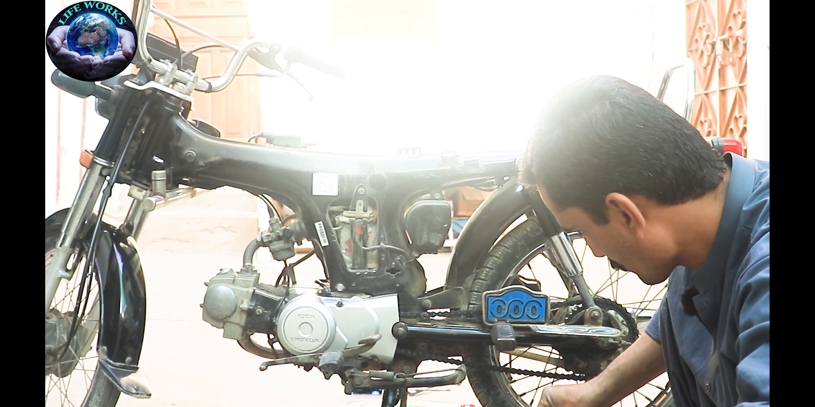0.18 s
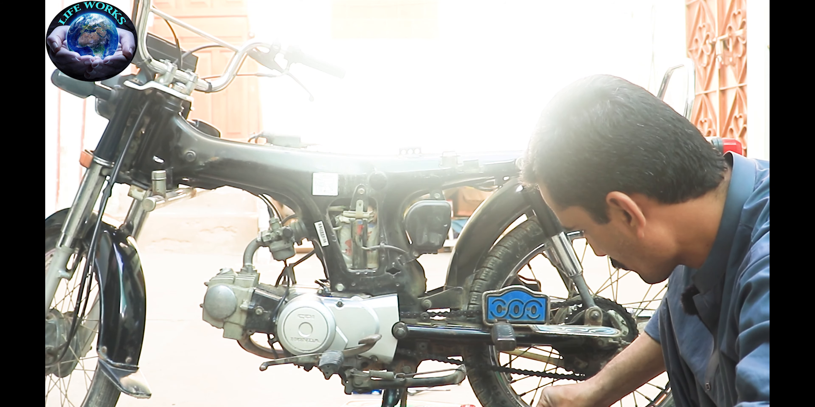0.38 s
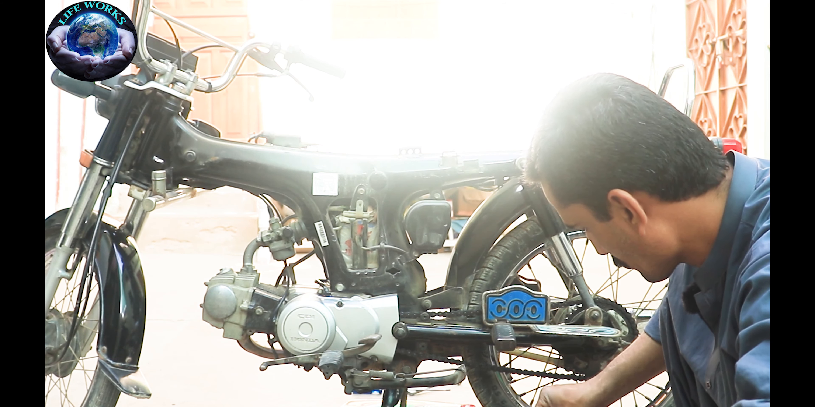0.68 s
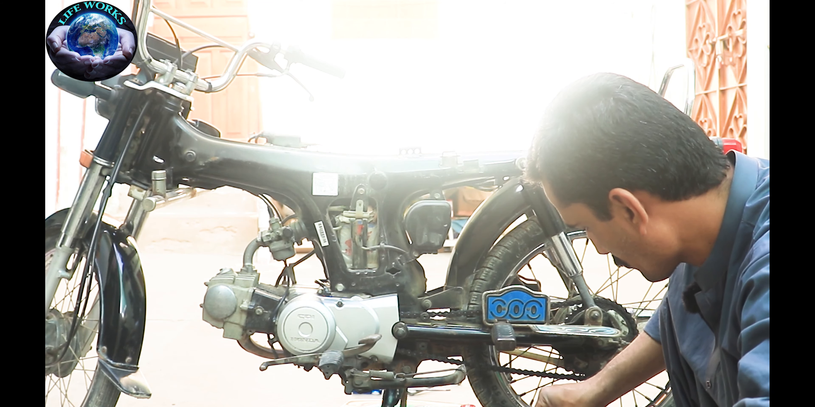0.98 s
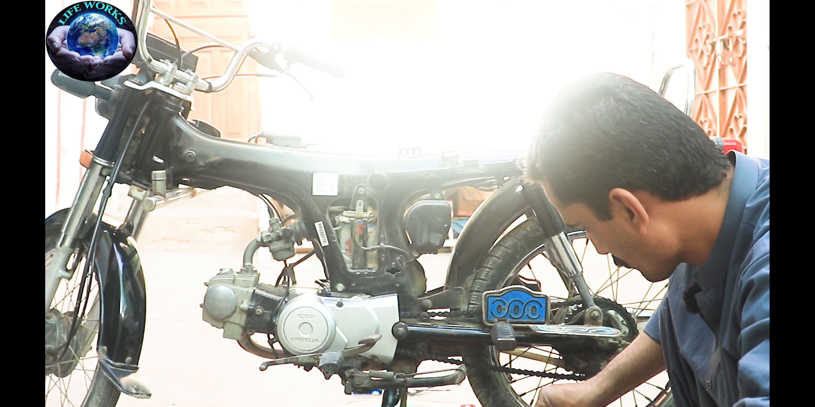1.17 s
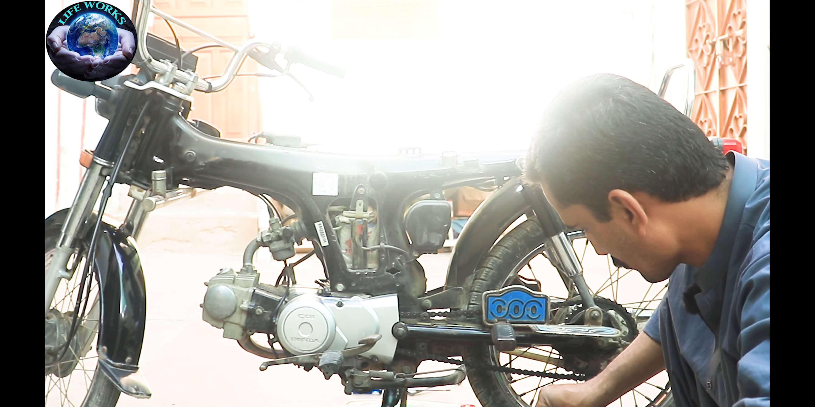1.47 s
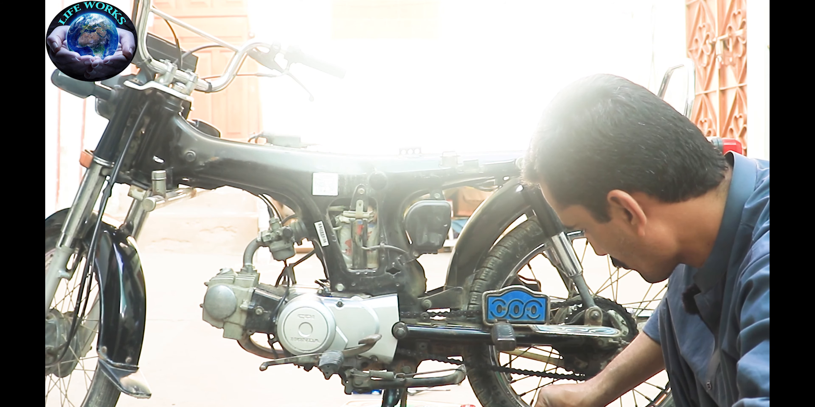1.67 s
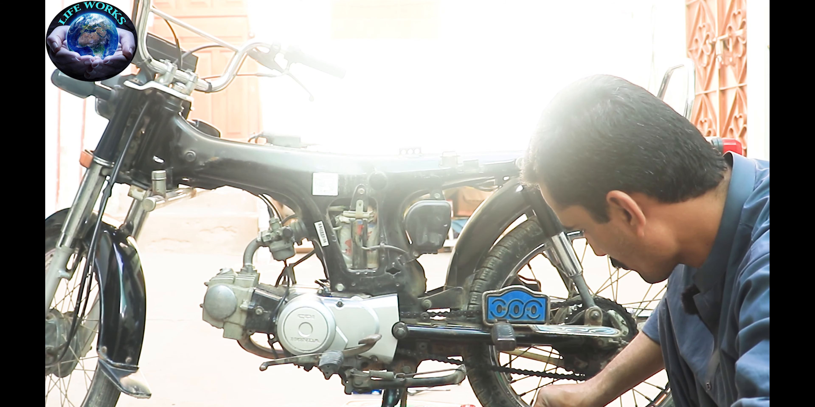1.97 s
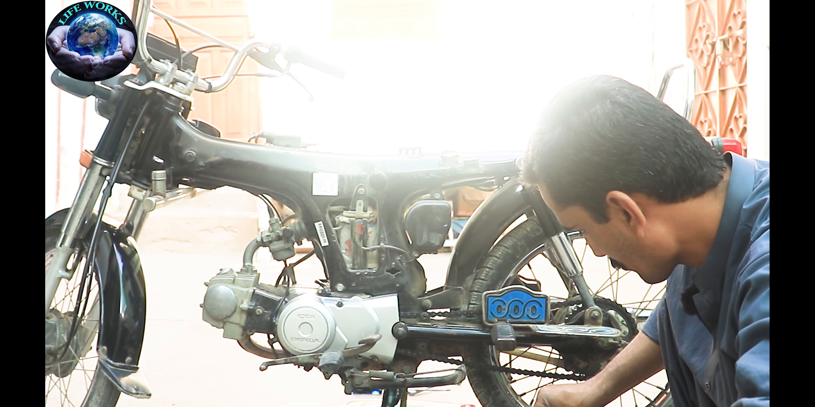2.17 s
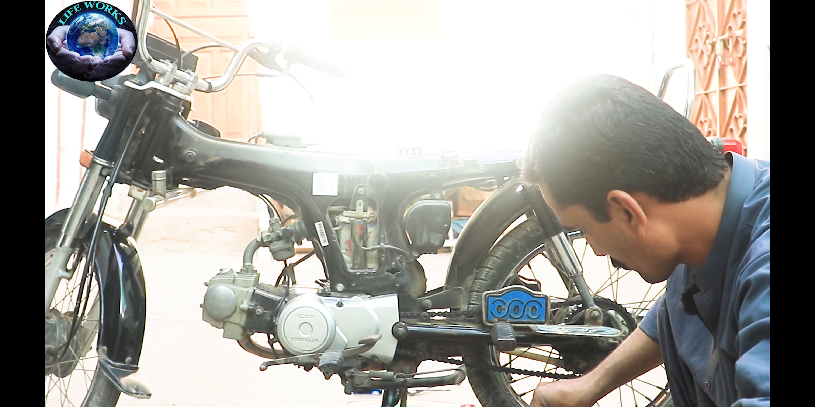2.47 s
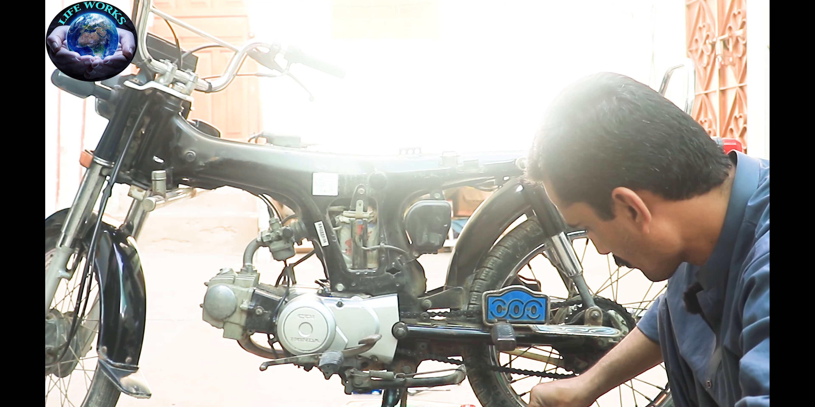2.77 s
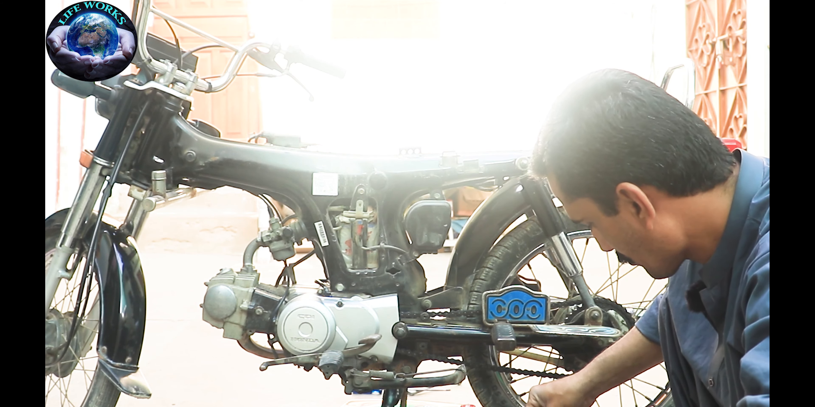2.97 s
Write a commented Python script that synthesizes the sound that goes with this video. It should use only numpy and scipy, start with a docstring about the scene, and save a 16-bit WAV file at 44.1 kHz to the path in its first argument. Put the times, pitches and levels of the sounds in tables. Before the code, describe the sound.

Steel balls drop into a metal fuel tank, striking the walls in uneven clusters of loud sharp cracks with short bright ring; faint rolling rattle and light ticks fill the gaps, very close microphone, slightly overloaded peaks.

```python
"""Inside a metal fuel tank, steel balls drop one after another and clatter against the walls.
Each blow is a snap and a crack of dense modes with a short ring, plus a thud that grows with force;
two weaker blows ring a low panel. Between them: ticks, mostly light, one strong; a faint rolling rattle of
tiny contacts that keeps the tank humming; gliding swishes of band-passed noise, some thin and whistling,
some broad and breathy. The close microphone limits and clips the hardest blows."""
import sys
import numpy as np
from scipy import signal
from scipy.fft import rfft, irfft
from scipy.io import wavfile
from scipy.ndimage import uniform_filter1d

SR = 44100
rng = np.random.default_rng(int(sys.argv[2]) if len(sys.argv) > 2 else 0)


def generate_wav(signal):
    """Clip the signal to [-1, 1] and save it as 16-bit WAV at the path in sys.argv[1]."""
    frames = np.transpose(np.atleast_2d(signal))
    scaled = np.clip(frames, -1, 1) * 32767
    pcm = np.round(scaled).astype(np.int16)
    wavfile.write(sys.argv[1], SR, pcm)


N = 138915
LOWEST_HZ = 496  # low cut for contacts and hum; the thud and panel supply the bass


def amp(db):
    """Decibels to gain."""
    return 10 ** (np.asarray(db) / 20)


def unit(x):
    """Scales to rms 1."""
    return x / np.sqrt(np.mean(x ** 2) + 1e-20)


def read(points, hz):
    """Reads a table on a log-frequency axis."""
    f, value = np.transpose(points)
    return np.interp(np.log(hz + 1), np.log(f + 1), value)


def add(mix, start_s, sound):
    """Mixes a sound in at start_s."""
    part = mix[max(round(start_s * SR), 0):][:len(sound)]
    part += sound[:len(part)]


def above(x, hz):
    """Steep causal high-pass."""
    return signal.sosfilt(signal.butter(6, hz, "high", fs=SR, output="sos"), x)


def colour(x, points, tilt_db_per_octave=0):
    """Shapes a spectrum, tilted about 5 kHz, at rms 1."""
    hz = np.fft.rfftfreq(len(x), 1 / SR)
    octaves = np.log2(np.maximum(hz, 500) / 5000)
    gain = amp(read(points, hz) + tilt_db_per_octave * octaves)
    return unit(irfft(rfft(x) * gain, len(x)))


def die_away(x, t60, hold_s=0.00095):
    """Holds briefly, then lets each band decay at its own rate."""
    hz, t, z = signal.stft(x, SR, nperseg=128)
    decay_db = -60 * np.maximum(t - hold_s, 0) / read(t60, hz)[:, None]
    return signal.istft(z * amp(decay_db), SR, nperseg=128)[1][:len(x)]


def band_noise(hz, width_hz):
    """Band-passed noise whose centre follows the curve hz, at rms 1."""
    count = len(hz) + SR // 10  # extra lead-in settles the filter
    noise = rng.standard_normal(count) + 1j * rng.standard_normal(count)
    lowpass = signal.butter(3, min(width_hz, SR / 2) / 2, fs=SR, output="sos")
    band = signal.sosfilt(lowpass, noise)[-len(hz):]
    carrier = np.exp(2j * np.pi * np.cumsum(hz) / SR)
    return unit((band * carrier).real)


AIR_DB = -60
RUMBLE_HZ, RUMBLE_WIDTH_HZ, RUMBLE_DB = 146, 98, -70


def quiet_air():
    """Bright differenced noise over a faint, lumpy band-passed rumble."""
    hiss = unit(np.diff(rng.standard_normal(N + 1)))
    rumble = band_noise(np.full(N, RUMBLE_HZ), RUMBLE_WIDTH_HZ)
    return amp(AIR_DB) * hiss + amp(RUMBLE_DB) * rumble


# low tank resonances: (frequency [Hz], level [dB], t60 [s])
HUM_MODES = [(735, 0, .13), (612, -6, .08)]


def hum(contacts):
    """Each contact rings the low resonances of the tank."""
    t = np.arange(SR) / SR
    ring = sum(amp(db - 60 * t / t60) * np.sin(2 * np.pi * hz * t) for hz, db, t60 in HUM_MODES)
    return above(signal.fftconvolve(contacts, ring)[:N], LOWEST_HZ)


CONTACTS_PER_S, CONTACT_SPREAD_DB, CONTACT_DECAY_S = 140, 4, 0.013
ROLL_HUM_DB = -9  # relative to the rattle
# rolling rattle level: (time [s], level [dB])
ROLL_LEVEL = [(0, -29.5), (0.048, -39), (.2, -40.5), (.3, -32), (.44, -52.5), (.66, -39.5), (.85, -44),
              (1.12, -43.5), (1.209, -44.5), (1.56, -41.5), (1.69, -42), (1.95, -38.5), (2.07, -41.5),
              (2.401, -39), (2.7, -52), (2.92, -52.5), (3.028, -80)]
# rolling rattle spectrum: (frequency [Hz], gain [dB])
ROLL_SPECTRUM = [(300, -39), (550, -6), (900, -4.5), (1450, 2.5), (2100, -4.5), (3500, 8), (7000, -1),
                 (11000, -7.5), (16000, -62)]


def rolling(wall):
    """Rolling balls make many tiny uneven contacts, each ringing the wall and feeding a wavering hum."""
    force = amp(CONTACT_SPREAD_DB * np.minimum(rng.exponential(1, N), 2))
    contacts = force * (rng.random(N) < CONTACTS_PER_S / SR)
    wall_ring = wall * np.exp(-np.arange(len(wall)) / SR / CONTACT_DECAY_S)
    rattle = colour(signal.fftconvolve(contacts, wall_ring)[:N], ROLL_SPECTRUM)
    level_db = np.interp(np.arange(N) / SR, *np.transpose(ROLL_LEVEL))
    return (rattle + amp(ROLL_HUM_DB) * unit(hum(contacts))) * amp(level_db)


LIKENESS = 0.54  # power share of the dense ring common to all contacts
RISE_S = 0.0018
SNAP_DB, SNAP_DECAY_S = -5, 0.0027
CRACK_DB = -4.5
TAIL_DB, TAIL_RISE_S = -17.5, 0.016
MODES_DB, MODE_SPREAD_DB, MODE_T60_S = -23, 1.5, 0.11
# crowded sheet-metal modes in the crack: (frequency [Hz], gain [dB])
CRACK_SPECTRUM = [(400, -16.5), (540, -16), (850, -17.5), (1250, -4.5), (2300, -12.5), (3600, 0.5),
                  (5200, 0), (6300, 4.5), (8000, -0.5), (11000, -0.5), (15500, -15.5)]
# crack decay: (frequency [Hz], t60 [s])
CRACK_DECAY = [(1200, 0.06), (6000, 0.055), (14000, 0.035)]
# crowded sheet-metal modes in the tail: (frequency [Hz], gain [dB])
TAIL_SPECTRUM = [(400, -22.5), (560, -6), (1300, -0.5), (2200, -7), (3500, 2.5), (6500, 2), (10000, 2.5),
                 (15500, -11)]
# tail decay, also that of the swish echo: (frequency [Hz], t60 [s])
TAIL_DECAY = [(300, 0.35), (800, 0.24), (2500, 0.36), (6000, 0.34), (14000, 0.23)]
# strongest tank modes: (frequency [Hz], level [dB])
STRONG_MODES = [(557, -4), (735, -13), (1173, -1), (1440, -4), (1620, -7), (1815, -4), (2256, -9),
                (3183, 0), (3730, 1), (4544, 1), (5690, -1), (6098, 3), (6225, 2), (6840, 0), (7645, -1)]


def contact(wall, tilt_db_per_octave):
    """A contact excites a snap, a crack of crowded modes, their longer tail and the strongest modes."""
    t = np.arange(len(wall)) / SR
    dense = np.sqrt(LIKENESS) * wall + np.sqrt(1 - LIKENESS) * rng.standard_normal(len(t))
    snap = amp(SNAP_DB) * unit(np.diff(rng.standard_normal(len(t) + 1))) * np.exp(-t / SNAP_DECAY_S)
    crack = amp(CRACK_DB) * die_away(colour(dense, CRACK_SPECTRUM, tilt_db_per_octave), CRACK_DECAY)
    tail = amp(TAIL_DB) * die_away(colour(dense, TAIL_SPECTRUM, tilt_db_per_octave), TAIL_DECAY)
    tail = tail * (1 - np.exp(-t / TAIL_RISE_S))
    ring = np.zeros(len(t))
    for hz, db in STRONG_MODES:
        level_db = MODES_DB + db + MODE_SPREAD_DB * rng.standard_normal()
        ring += amp(level_db - 60 * t / MODE_T60_S) * np.sin(2 * np.pi * (hz * t + rng.random()))
    return above((snap + crack + tail + ring) * np.minimum(t / RISE_S, 1), LOWEST_HZ)


TOUCH_HUM_DB = -21
# ticks, mostly light, one strong: (time [s], level [dB], brightness [dB per octave])
TICKS = [(0.001, -22.5, -11), (0.0585, -21, 11), (0.177, -27, 3), (0.3272, -25.5, -5), (0.714, -28, -3.5),
         (0.7415, -27.5, -4.5), (1.0815, -26, -2.5), (1.152, -33.5, 4), (1.510, -24, -3),
         (1.541, -29, -3.5), (1.6213, -27.5, -1), (1.7075, -27, -3), (2.0232, -22.5, -1.5),
         (2.0739, -19.5, -2.5), (2.1844, -22.5, -2), (2.2934, -4.5, 5.5), (2.544, -14, 17)]


def ticks(wall):
    """Ticks on the shared wall, each with its own brightness; duller ones excite more hum for their level."""
    out, touches = np.zeros(N), np.zeros(N)
    for start_s, db, tilt in TICKS:
        add(out, start_s, amp(db) * contact(wall, tilt))
        add(touches, start_s, amp([TOUCH_HUM_DB + db - tilt]))
    return out + hum(touches)


# gliding swishes: (start [s], length [s], first [Hz], last [Hz], width [Hz], level [dB])
SWISHES = [(0.101, 0.043, 7400, 6960, 2350, -33), (0.778, 0.098, 4070, 2740, 447, -40.5),
           (1.468, 0.058, 4250, 3450, 400, -38), (1.505, 0.053, 2600, 3230, 450, -30),
           (2.658, 0.083, 5830, 6840, 4020, -36), (2.87, 0.075, 4100, 3570, 504, -29),
           (2.91, .08, 3500, 4230, 1010, -36.5), (3.003, .1, 6100, 4870, 2880, -31.5),
           (3.076, 0.12, 5440, 7000, 4160, -34)]


def swishes(wet_db=-5, lowest_hz=2500):
    """Band-passed noise, thin or broad, glides and levels off as it swells and fades, then echoes."""
    out = np.zeros(N)
    for start_s, length_s, first_hz, last_hz, width_hz, db in SWISHES:
        u = np.linspace(0, 1, int(length_s * SR))
        glide_hz = first_hz + (last_hz - first_hz) * np.sin(np.pi / 2 * u)
        add(out, start_s, amp(db) * unit(band_noise(glide_hz, width_hz) * np.sin(np.pi * u)))
    echo = die_away(rng.standard_normal(16384), TAIL_DECAY)
    wet = signal.fftconvolve(out, echo / np.linalg.norm(echo))[:N]
    return above(out + amp(wet_db) * wet, lowest_hz)


THUD_DB, THUD_DECAY_S = -33, 0.0016  # level before decay


def thud(top_hz=500):
    """A push on the whole tank: low-passed noise that dies at once, with no ring."""
    t = np.arange(SR // 10) / SR
    push = signal.lfilter(*signal.butter(2, top_hz, fs=SR), rng.standard_normal(len(t)))
    return amp(THUD_DB) * unit(push) * np.exp(-t / THUD_DECAY_S)


DULLING = 0.31  # harder blows are darker [dB per octave per dB of force]
# blows on the wall: (time [s], level [dB])
BLOWS = [(.2140, -7.5), (0.2602, -9), (0.4654, 6), (0.486, -2), (0.5208, -0.5), (0.5497, -1.5),
         (0.871, -2.5), (.8930, -1), (0.94, -0.5), (0.9454, -1.5), (0.963, -8.5), (1.243, -1.5), (1.273, 0),
         (1.279, -4.5), (1.3105, -1), (1.3472, -1.5), (1.3637, -4), (1.7138, 4.5), (1.7835, -1),
         (1.7984, -1.5), (1.847, 0.5), (1.856, 4), (1.8990, -2), (2.0982, -1.5), (2.2167, -1),
         (2.2493, -2.5), (2.2697, -3), (2.2988, -4.5), (2.333, -1.5), (2.3935, -1), (2.4070, -2),
         (2.5496, -1.5), (2.602, -2.5), (2.7472, -2), (2.8123, -2), (2.8427, -1.5)]


def blows(wall):
    """Balls strike the shared wall; each adds a thud that grows as force squared, up to 0 dB of force."""
    out = np.zeros(N)
    for start_s, db in BLOWS:
        add(out, start_s, amp(db) * contact(wall, -DULLING * db))
        add(out, start_s, min(amp(db), 1) ** 2 * thud())
    return out


# the two weaker blows that ring the panel: (time [s], level [dB])
PANEL_BLOWS = [(.2140, -29), (0.2604, -29)]
# panel modes: (frequency [Hz], level [dB], t60 [s])
PANEL_MODES = [(372, -17.5, 1), (470, -15.5, 0.28), (762, 3.5, 0.2), (1330, -8, 0.13), (1550, -3, 0.21),
               (2500, -8, 0.31)]


def panel(rise_s=0.00043, beat_width_hz_per_khz=40, beating=0.61):
    """A broad panel rings low after two weaker blows; close neighbours make its modes beat."""
    out, t = np.zeros(N), np.arange(SR) / SR
    for start_s, level_db in PANEL_BLOWS:
        for hz, db, t60 in PANEL_MODES:
            neighbours = band_noise(np.full(len(t), hz), beat_width_hz_per_khz * hz / 1000)
            tone = np.sin(2 * np.pi * hz * t) + beating * neighbours
            envelope = amp(level_db + db - 60 * t / t60) * (1 - np.exp(-t / rise_s)) ** 2
            add(out, start_s, envelope * tone)
    return out


ECHO_S, ECHO_DB = 0.032, -17.5


def surface_echo(clatter):
    """One delayed, weaker reflection from a nearby surface."""
    out = np.zeros(N)
    add(out, ECHO_S, amp(ECHO_DB) * clatter)
    return out


def scene():
    """The tank, its echo from a nearby surface, and the quiet air around it."""
    wall = rng.standard_normal(20000)  # noise pattern shared by all contacts
    clatter = ticks(wall) + blows(wall)
    mix = quiet_air() + rolling(wall) + clatter + swishes() + panel() + surface_echo(clatter)
    return mix[None]


LIMIT_DB, LIMIT_SHARE, RECOVER_DB_PER_S = -2, 0.66, 515.5  # share of the excess removed
CEILING = 0.81  # clip level, before bass cut and band limit
BASS_HZ, BASS_CUT = 402, 0.55  # share removed
EDGE_HZ = 15950


def record(dry):
    """A quick limiter, overload on the peaks, thinned bass, then the band limit."""
    power_db = 10 * np.log10(abs(uniform_filter1d(dry[0] ** 2, size=88)) + 1e-12)
    fall_db = np.arange(N) * RECOVER_DB_PER_S / SR
    held_db = np.maximum.accumulate(power_db + fall_db) - fall_db  # instant rise, steady fall
    over_db = np.maximum(held_db - LIMIT_DB, 0)
    limited = dry * amp(-LIMIT_SHARE * uniform_filter1d(over_db, size=44))
    clipped = np.clip(limited, -CEILING, CEILING)
    bass = signal.sosfiltfilt(signal.butter(2, BASS_HZ, fs=SR, output="sos"), clipped)
    thin = clipped - BASS_CUT * bass
    band_limit = signal.firwin(255, EDGE_HZ, window=("kaiser", 8), fs=SR)
    return signal.oaconvolve(thin, band_limit[None], "same")


dry = scene()
out = record(dry)
generate_wav(out)
```